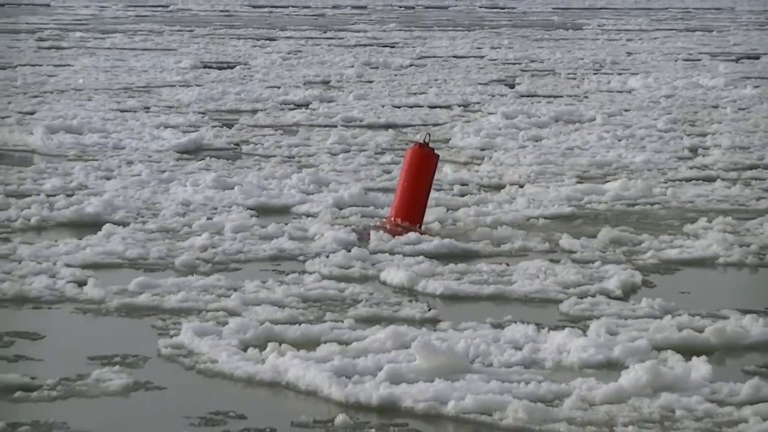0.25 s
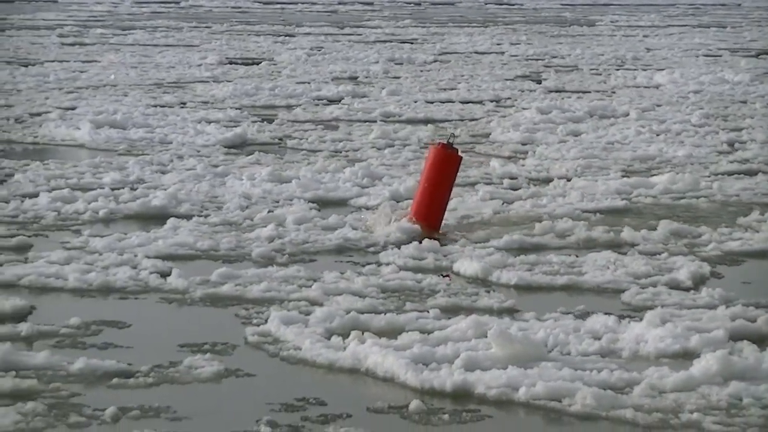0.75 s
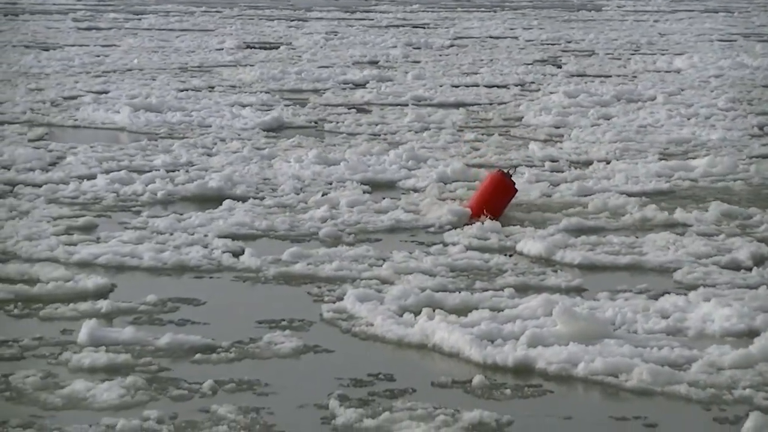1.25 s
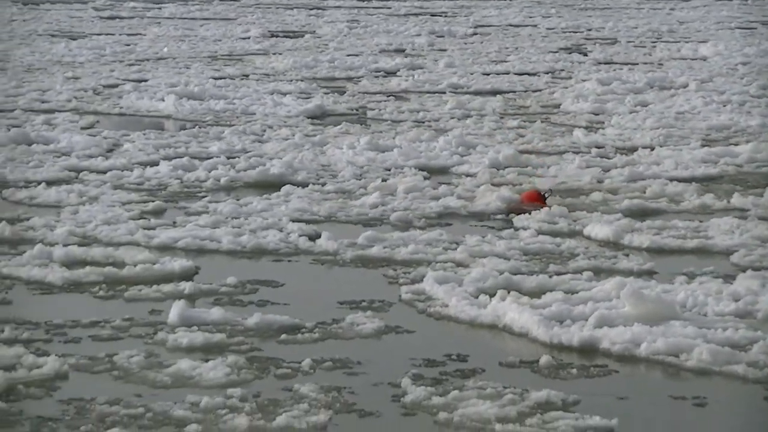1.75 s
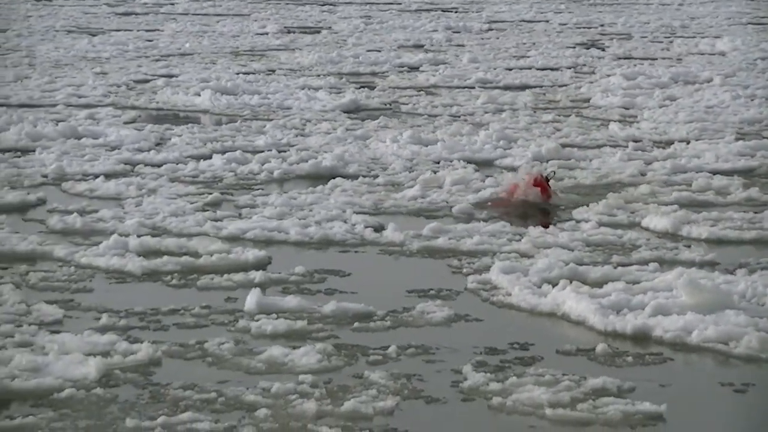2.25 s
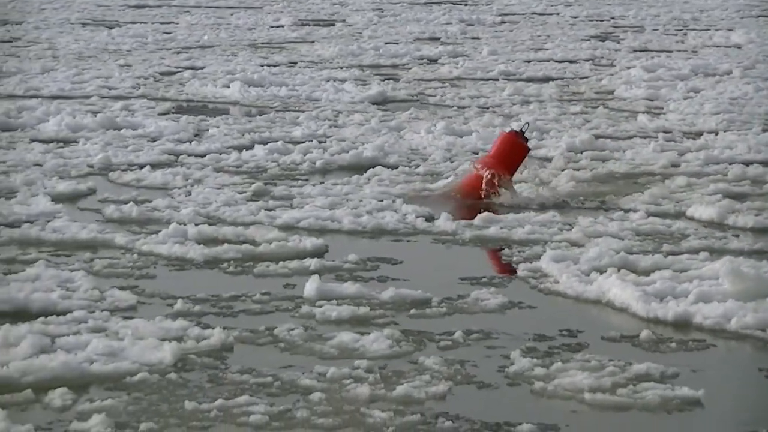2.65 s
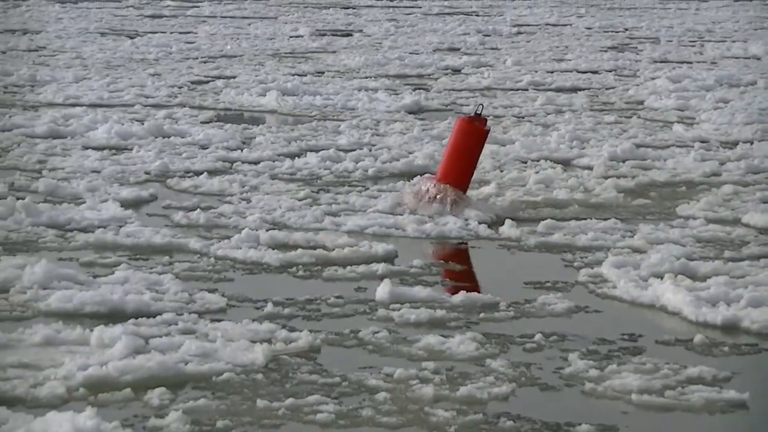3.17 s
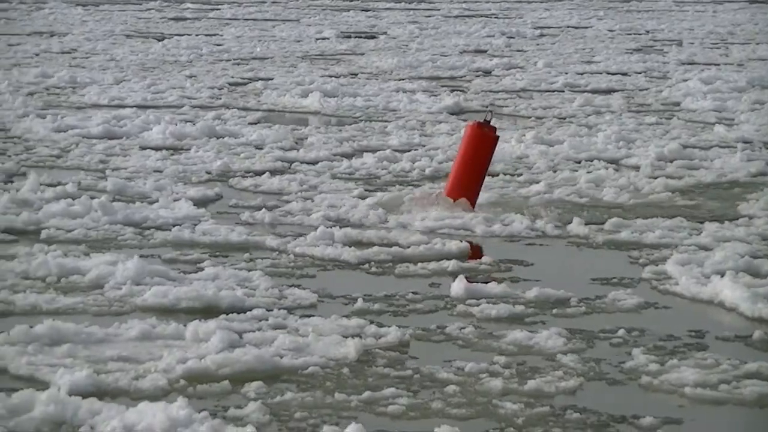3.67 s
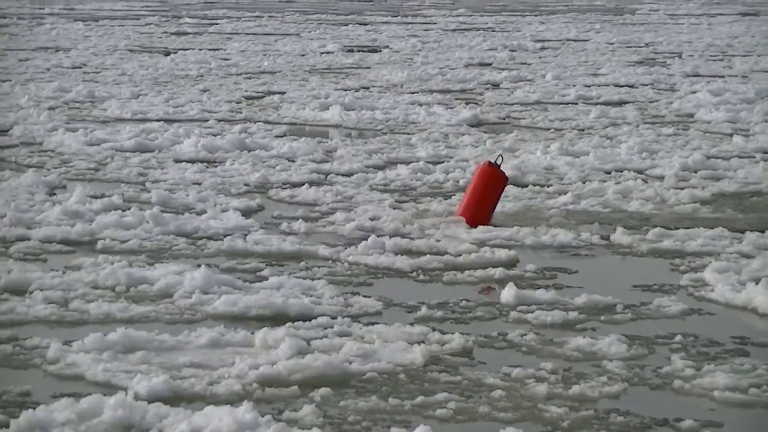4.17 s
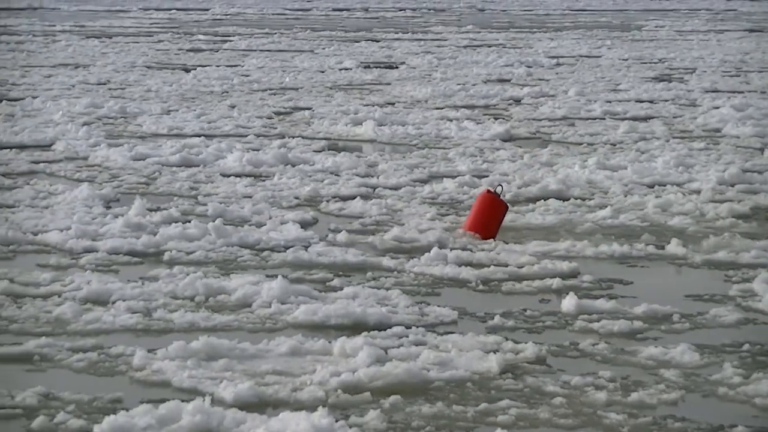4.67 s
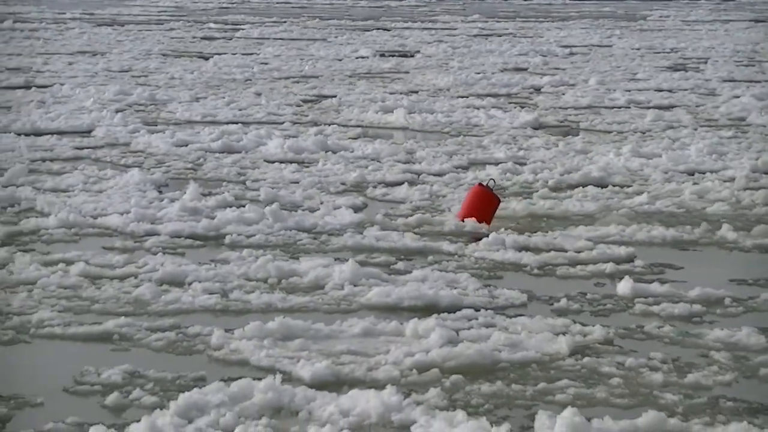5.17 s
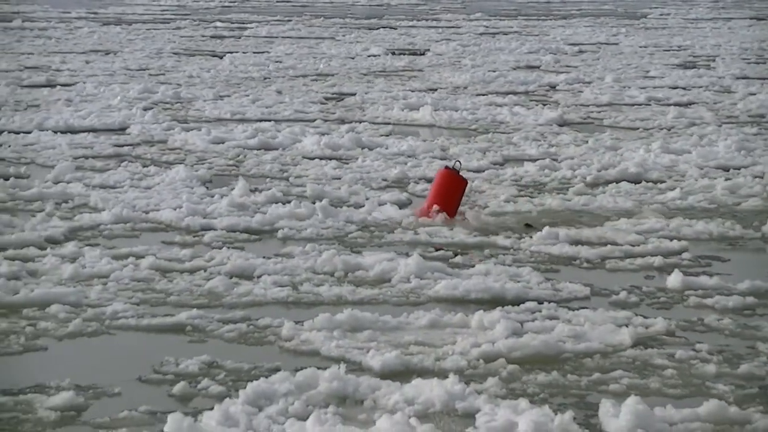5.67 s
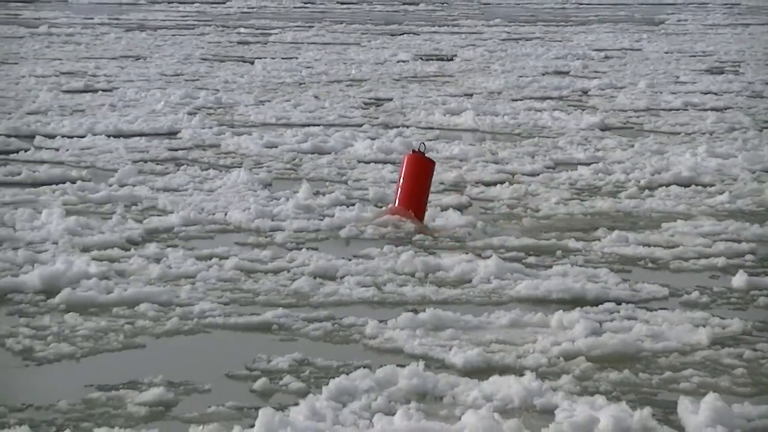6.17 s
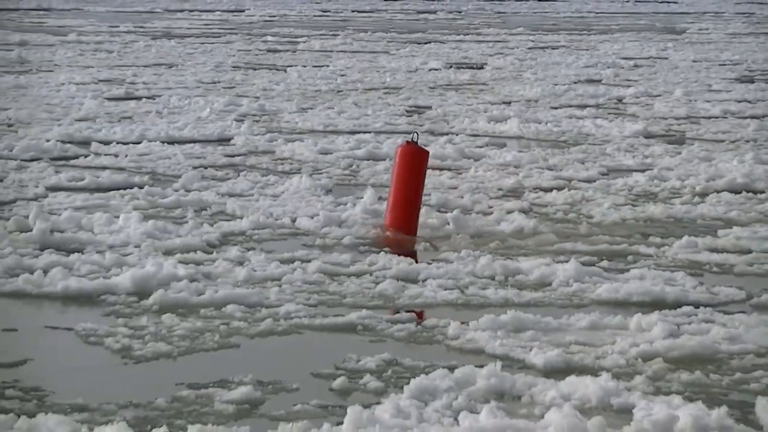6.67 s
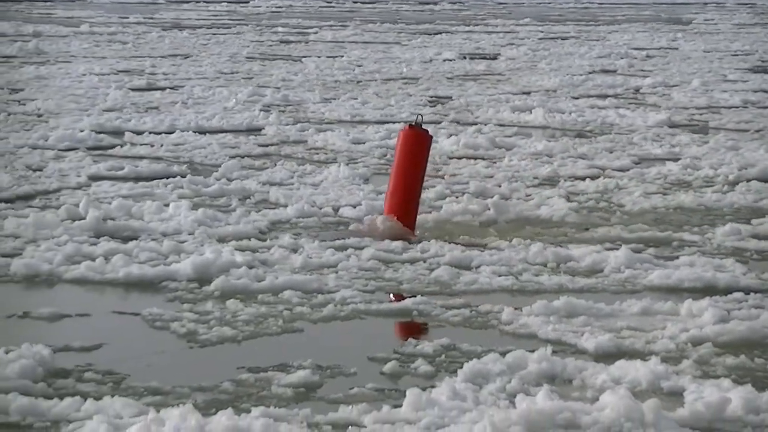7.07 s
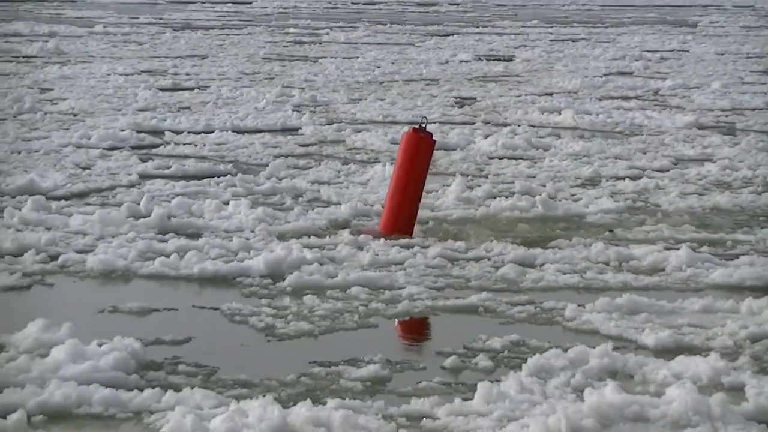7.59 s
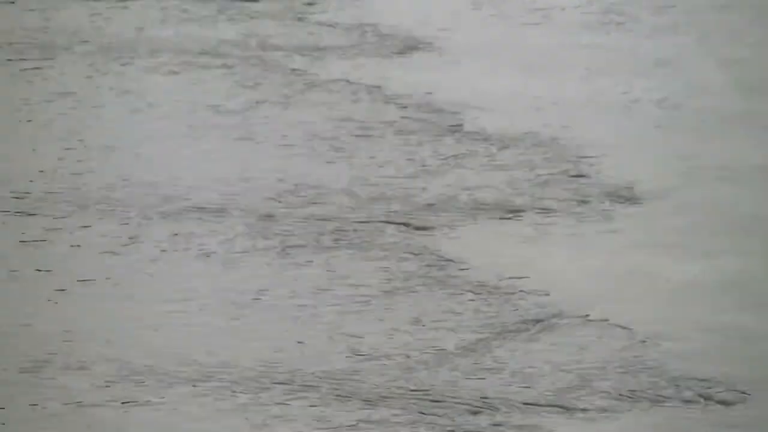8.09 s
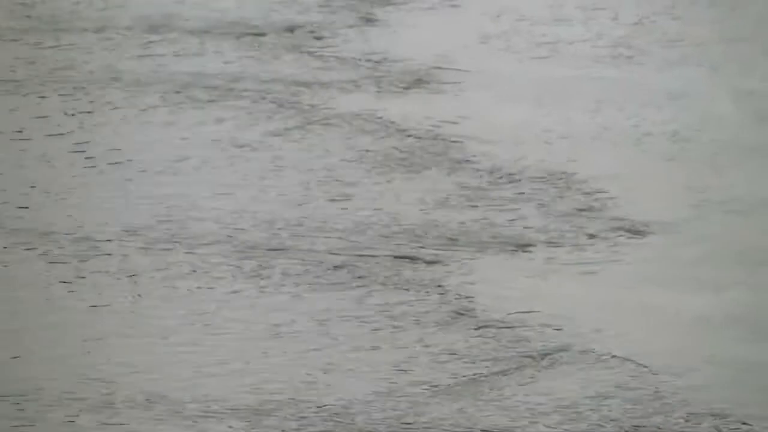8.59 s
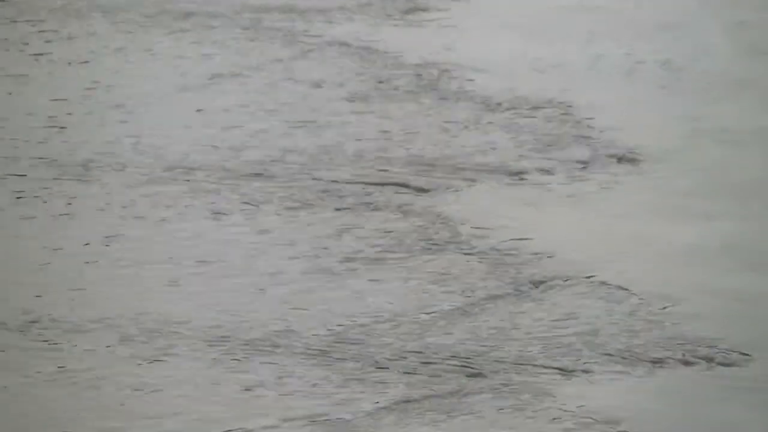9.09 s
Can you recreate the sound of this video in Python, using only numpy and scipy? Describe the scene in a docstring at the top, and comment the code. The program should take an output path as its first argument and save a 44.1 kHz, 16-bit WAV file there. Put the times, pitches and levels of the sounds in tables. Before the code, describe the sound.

Quiet slushy ice floes grind and knock together, a buoy surfaces with a small splash, then suddenly loud, dense rushing water takes over.

```python
"""Drifting river ice, straight ahead: floe rims rub, scrape and knock, driven by one pressure curve.
Slush sizzles as dense tiny impacts; water laps as filtered noise and plops and gulps as brief damped tones.
Crystals snap; a buoy, dragged under by the ice, surfaces with a splash and foam fizzes around it.
Light wind puffs and thuds at the stereo microphone, as shaped noise and short dull tones.
Then the scene changes abruptly to a much louder, steady rush of flowing water, a dense wide churn."""
import sys
import numpy as np
from scipy import signal
from scipy.fft import rfft, irfft, next_fast_len
from scipy.io import wavfile
from scipy.ndimage import uniform_filter1d, map_coordinates

SR = 44100
rng = np.random.default_rng(int(sys.argv[2]) if len(sys.argv) > 2 else 0)


def to_wav(s):
    """Save 16-bit WAV."""
    ch = np.atleast_2d(s).T  # columns
    pcm = np.round(np.clip(ch, -1, 1) * 32767)  # PCM
    wavfile.write(sys.argv[1], SR, pcm.astype(np.int16))


N = 411894

# how hard the floes press together, as the loudness of their rubbing before small offsets: t/s, level/dB
FLOE_PRESSURE = [(0.0, -47.5), (0.26, -49.5), (0.35, -42), (0.64, -43), (0.78, -37.5), (0.98, -35),
                 (1.35, -39), (1.56, -40), (1.78, -45), (2.24, -39.5), (3.16, -33.5), (3.6, -33.5),
                 (3.99, -39), (4.3, -37), (5.11, -47), (5.28, -42), (5.98, -41.5), (6.38, -39),
                 (6.59, -41.5), (6.79, -40), (7.14, -41), (7.87, -40)]
USUAL_DB = -40
# change in scraping as rims lean together or slide past each other: t/s, change/dB
SLIDING_CHANGE = [(1.5, 0.5), (2.1, -2.5), (2.66, -2.5), (2.85, -0.5), (4.4, 1.5), (4.75, 6), (5.2, 0.5),
                  (7.0, 2.5), (7.88, -.5)]
# smaller, higher-pitched floes take over from large ones: t/s, power share of small floes/0-1
SMALL_FLOE_SHARE = [(2.3, 0.1), (3.4, 0.78)]
# sizzle of slush between the floes, before a small lift: t/s, level/dB
SLUSH_LEVEL = [(0.0, -46), (0.42, -44.5), (0.81, -41.5), (2.06, -42), (2.7, -39), (3.51, -38),
               (4.17, -39.5), (4.41, -41), (4.76, -41), (5.55, -43), (6.23, -42), (6.8, -38.5),
               (7.62, -42.5), (7.88, -44.5)]
# spectrum of rubbing, before the pitch of large or small floes: f/Hz, level/dB
RUB_SPECTRUM = [(100, -72), (250, -32.5), (400, -12), (540, -2.5), (720, 1), (860, -0.5), (1000, -11),
                (1500, -33), (3000, -54)]
# spectrum of scraping rims: f/Hz, level/dB
SCRAPE_SPECTRUM = [(600, -45.5), (1000, -5), (1250, 1), (1470, 2), (1850, -2.5), (2150, -2.5), (2600, -14),
                   (5000, -45)]
# spectrum of sizzling slush: f/Hz, level/dB
SIZZLE_SPECTRUM = [(60, -69), (200, -36), (900, -5), (2400, -1.5), (2900, 2), (3400, -2), (4100, -1),
                   (4700, -3.5), (5600, -2), (6600, -6), (8000, -12.5), (12000, -24), (14500, -31.5),
                   (16000, -41)]
# level at the usual pressure/dB, and dB gained per dB of pressure
SCRAPE_DB, SCRAPE_GROWS = -43.5, 0.55
LAP_DB, LAP_GROWS = -64.5, 0.79
PLOP_DB, PLOP_GROWS = -37, 1
GULP_DB, GULP_GROWS = -38, 0.96

# loudest knocks between floes, before the bass cut:
# t/s, rms level/dB, length/s, change of the upper modes/dB, pitch over that of the usual floe/ratio
FLOE_KNOCKS = [(0.747, -33, 0.0067, 3, 0.93), (0.848, -40, 0.027, -18, 0.89), (0.94, -35, 0.013, -10, .95),
               (0.969, -36, 0.022, -16, 1.06), (1.132, -34, 0.013, -6, 0.86),
               (1.247, -32, 0.011, -18, 0.96), (1.411, -32, 0.0096, -8, 1.02),
               (2.563, -34, 0.011, -12, .89), (2.978, -33, 0.018, -1, 1.02), (4.245, -35, .008, -18, 1),
               (4.853, -38, 0.02, -2, 1.2), (5.25, -36, 0.019, 0, 1.02), (5.352, -34, .008, -3, 1.14),
               (5.375, -30, 0.008, -6, 1.06), (5.382, -25, 0.005, 5, 1.01), (5.424, -30.5, 0.023, 3, 1),
               (5.48, -33, 0.007, 0, 1.03), (5.659, -37.5, 0.015, -14, 0.94)]
# ringing modes of the usual floe: f/Hz, level/dB, t60/s
FLOE_MODES = [(730, 2, 0.03), (875, -8, 0.037), (1486, 3, 0.017), (2040, -17, .012), (2830, -11, 0.0051)]
# crumbs around each knock: level below it/dB, half length/s
CRUMBS_DB, CRUMBS_HALF_S = -16, 0.023
# spectrum of crunching crumbs: f/Hz, level/dB
CRUNCH_SPECTRUM = [(50, -45), (150, -29), (300, -8.0), (750, 2.0), (1100, -4.0), (1500, -0.5),
                   (2200, -14.0), (5000, -24), (12000, -54)]

# spectrum of water lapping under the floes, also of the buoy's slosh: f/Hz, level/dB
LAP_SPECTRUM = [(25, -40), (80, -24), (130, -29), (200, -7), (280, 6.5), (380, 1.5), (600, -9), (1500, -51)]
# clearest plops under the floes, before the bass cut: t/s, peak level/dB, f/Hz
CLEAR_PLOPS = [(0.333, -33, 600), (0.474, -31, 655), (0.749, -29, 794), (0.951, -26.5, 770),
               (1.219, -25, 760), (1.274, -23.5, 710), (1.542, -31, 760), (2.106, -29, 685),
               (2.4205, -25, 760), (2.568, -28, 640), (2.7325, -22, 750), (2.846, -25, 760),
               (3.145, -23.5, 760), (3.913, -25, 860), (4.321, -26, 805), (4.3845, -27.5, 750),
               (4.736, -27, 745), (5.378, -16.5, 760), (5.394, -22.5, 680), (5.444, -22, 696),
               (5.6686, -29, 690), (6.256, -23, 790), (6.366, -25, 780), (6.42, -29, 880),
               (6.827, -24.5, 820), (6.847, -26, 740), (7.761, -20.5, 865)]
# gulps and low hollow tones at set times: t/s, peak level/dB, f/Hz
PLACED_GULPS = [(0.775, -30, 740), (2.555, -33, 584), (2.658, -29, 527), (3.411, -41, 253),
                (5.384, -38.5, 330)]
# snapping crystals, before a common trim:
# t/s, level/dB, f/Hz, change of the overtones/dB, power share of ring against dry crack/0-1
CRYSTAL_SNAPS = [(0.7467, -23.5, 2035, -6, .85), (1.411, -25.5, 1575, 1, .7), (1.6926, -29, 2600, -3, .3),
                 (1.956, -32, 3000, -10, .6), (2.666, -28, 3020, -5, .6), (5.6865, -24, 2800, -8, 0.15)]
# overtones of a crystal, before each snap's change: pitch over the lowest mode/ratio, level/dB
CRYSTAL_OVERTONES = [(1.47, 1), (1.9, -7)]

# water washing through the slush: t/s of the middle, rms level/dB at the peak, half length/s, centre f/Hz
SLUSH_WASHES = [(1.68, -46, .05, 4020), (2.166, -42, 0.025, 1700), (2.512, -38, .014, 1900),
                (2.722, -37, 0.008, 1450), (3.235, -44, .024, 6000), (4.062, -38.5, .016, 4100),
                (4.59, -40, 0.036, 1720), (4.858, -45.5, .03, 4180), (5.387, -46, 0.06, 3800),
                (5.42, -39, 0.032, 1100), (5.84, -39, .018, 1500), (5.915, -51.5, 0.048, 6960),
                (6.89, -36, 0.0071, 1500), (7.61, -45, 0.09, 1200)]
WASH_OCTAVES = 0.96  # width of each band

# the buoy surfaces: time and rise/s
SPLASH_S, SPLASH_RISE_S = 2.718, 0.012
# starting level/dB and fall/dB per s
SPRAY_DB, SPRAY_FALL_DB_PER_S = -38, 50
WET_DB, WET_FALL_DB_PER_S = -36, 18
SLOSH_DB, SLOSH_FALL_DB_PER_S = -47.5, 73
# uneven dollops of falling water: rate/per s, swing/dB
DOLLOPS_PER_S, DOLLOP_DB = 45, 2
# sheet of fine droplets: delay/s, length/s, level/dB
SHEET_DELAY_S, SHEET_S, SHEET_DB = 0.014, 0.078, -36.5
# foam around the buoy: middle/s, half length/s, level/dB
FOAM_S, FOAM_HALF_S, FOAM_DB = 2.9, 1.04, -51.5
# spectra of the buoy's spray, wet band, droplets and foam: f/Hz, level/dB
SPRAY_SPECTRUM = [(1500, -39), (2900, 15), (5500, 6.0), (8000, -14), (14500, -31)]
WET_SPECTRUM = [(200, -68), (900, -31), (1300, -4.0), (1500, -1), (1700, -7.5), (2300, -37), (5000, -62)]
DROPLET_SPECTRUM = [(1800, -27), (3200, 2.5), (6000, 0), (8000, -9), (11000, -15), (15000, -20)]
FOAM_SPECTRUM = [(2000, -32), (4500, 2), (7500, 0.5), (10000, -8.0), (14500, -19)]

CUT_S = 7.9125  # the rush replaces the ice
RUSH_DB = -13.5
# spectrum of rushing water: f/Hz, level/dB
RUSH_SPECTRUM = [(24, -86), (40, -64), (101, -55), (202, -35), (260, -20.5), (461, -4.5), (778, -0.5),
                 (1350, -4), (4130, -21.5), (6640, -33), (8730, -47), (10700, -59.5), (13300, -61),
                 (15500, -69)]
# lead of the left over the right channel, roughly: f/Hz, level/dB
RUSH_BALANCE = [(420, 0), (1000, 0.8), (2400, 1.8), (7000, 2.2), (12000, 3)]
# stereo spread of the rush: f/Hz, level/dB
RUSH_SPREAD_SPECTRUM = [(180, -49), (380, -41), (480, -8.0), (750, -1), (1400, -1.5), (3000, -14),
                        (6000, -22.0), (10000, -28.0), (14000, -49)]

# clearest puffs of wind at the microphone, before a common trim: t/s of the middle, rms level/dB, half length/s
WIND_PUFFS = [(0.11, -55, 0.029), (0.4, -50, .012), (0.48, -46, .014), (0.88, -52.5, 0.063),
              (1.138, -44.5, .022), (1.7, -45.5, .011), (4.552, -47.5, 0.011), (5.2, -59, 0.12),
              (7.198, -47, 0.016)]
# breeze, before the same trim: first and last level/dB, time to settle/s, flutter/dB
BREEZE_DB, CALM_DB, SETTLE_S, FLUTTER_DB = -56.5, -65.5, 0.73, 4.5
# gust, before the same trim: first eddy t/s and level/dB, spacing/s, loss per eddy/dB, first half length/s
GUST_S, GUST_DB, EDDY_GAP_S, EDDY_LOSS_DB, EDDY_HALF_S = 7.46, -30, 0.0426, 4.5, 0.0068
# spectrum of wind at the microphone: f/Hz, level/dB
BUFFET_SPECTRUM = [(25, -37), (80, -30), (130, -8.5), (200, 1.5), (450, 4.5), (700, -4.0), (1200, -9.5),
                   (5000, -52), (12000, -73)]
THUD_S = 7.4548
# modes of the gust's thud: f/Hz, peak level/dB
THUD_MODES = [(477, -23.5), (250, -37.5)]
# the level of the ice sounds dips briefly just after the thud: middle/s, half length/s, depth/dB
DIP_S, DIP_HALF_S, DIP_DB = 7.466, 0.01, -5.5
# soft low thuds, one at the abrupt change, before a common lift: t/s, level/dB
LOW_THUDS = [(5.384, -48), (7.912, -24), (8.206, -39)]
# faint stereo width before the rush: f/Hz, level/dB
WIDTH_SPECTRUM = [(50, -15), (250, -24.0), (1000, 2), (4200, -9.0), (6000, -10), (10500, -13.0), (13000, -48)]
TOP_HZ = 15600  # band limit


def drifting_ice():
    """Rims catch and slip in small jerks, while crystals in the slush break by the thousand."""
    jerk = wobble(22)  # one stick-slip motion drives both the rub and the scrape

    small_share = curve(SMALL_FLOE_SHARE)
    large, small = [
        coloured(contacts(rate=450, spread_db=1.0, far_db=2.0), [(hz * pitch, db) for hz, db in RUB_SPECTRUM])
        for pitch in (0.98, 1.12)]
    floes = np.sqrt(1 - small_share) * large + np.sqrt(small_share) * small
    rub_db = USUAL_DB + pressure() - 0.7 + 0.81 * jerk
    rub = amp(rub_db) * patchy(floes, depth_db=0.76)

    rims = patchy(contacts(rate=700, spread_db=1.0, far_db=3.5), depth_db=1.5)
    scrape_db = SCRAPE_DB + SCRAPE_GROWS * pressure() + curve(SLIDING_CHANGE) + 0.35 * jerk
    scrape = amp(scrape_db) * coloured(rims, SCRAPE_SPECTRUM)

    crystals = patchy(contacts(rate=3000, spread_db=6.5, far_db=7.0), depth_db=1.04)
    sizzle_db = curve(SLUSH_LEVEL) + 0.93 + 0.38 * wobble(10)
    sizzle = amp(sizzle_db) * coloured(crystals, SIZZLE_SPECTRUM)
    return rub + scrape + sizzle


def pressure():
    """dB by which the floes press harder than usual, per sample."""
    return curve(FLOE_PRESSURE) - USUAL_DB


def knocks():
    """Each contact is a short run of slips into the briefly ringing modes of wet ice."""
    out = np.zeros(N)
    for s, db, length, upper_db, pitch in FLOE_KNOCKS:
        count = int(length * SR)
        knock = 0
        for hz, level, t60 in FLOE_MODES:
            slips = rng.standard_normal(count) * signal.windows.tukey(count)
            mode = signal.fftconvolve(slips, ring(hz * pitch, t60, attack=0.00045))
            mode_db = level + (hz > 1100) * upper_db
            knock = knock + amp(mode_db) * unit(mode)
        # all the energy, tail included, counts towards the rms over the knock's length
        add(out, s, amp(db) * knock * np.sqrt(count / np.sum(knock ** 2)))
    return no_bass(out)


def crumbs():
    """Every knock crushes the soft rim: a short crunch leads into it and trails after it."""
    power = sum(amp(2 * db) * swell(s + length, CRUMBS_HALF_S) for s, db, length, _, _ in FLOE_KNOCKS)
    crunch = coloured(contacts(rate=400, spread_db=3.5, far_db=-4), CRUNCH_SPECTRUM)
    return amp(CRUMBS_DB) * np.sqrt(power) * crunch


def no_bass(x):
    """A small slab radiates hardly any bass."""
    return signal.sosfilt(signal.butter(4, 380, "high", fs=SR, output="sos"), x)


def plops():
    """Water claps shut under the edge of a floe: a few round cycles swell and die at once."""
    out = np.zeros(N)
    jostle_db = PLOP_DB + PLOP_GROWS * pressure()
    scattered = random_tones(24, jostle_db, spread_db=1, typical_hz=733, octaves=0.27)
    for s, db, hz in list(CLEAR_PLOPS) + scattered:
        add(out, s, amp(db) * ring(hz, t60=0.011, attack=0.003))
    return no_bass(out)


def lapping():
    """Small waves slap the undersides of the floes, harder as the floes jostle."""
    level_db = LAP_DB + LAP_GROWS * pressure() + 6.3 * wobble(21)
    return amp(level_db) * coloured(contacts(rate=90, spread_db=3.0, far_db=2.0), LAP_SPECTRUM)


def gulps():
    """Air pockets under the ice pulse, rising slightly in pitch; pressure makes the scattered ones louder."""
    out = np.zeros(N)
    squeeze_db = GULP_DB + GULP_GROWS * pressure()
    scattered = random_tones(8.2, squeeze_db, spread_db=1, typical_hz=734, octaves=0.168)
    for s, db, hz in list(PLACED_GULPS) + scattered:
        add(out, s, amp(db) * ring(hz, t60=0.042, attack=0.007, glide=0.069))
    return out


def snaps():
    """A crystal breaks with a tiny broad crack and a bright, brief ring."""
    out = np.zeros(N)
    t = np.arange(SR // 8) / SR
    for s, db, hz, upper_db, ringing in CRYSTAL_SNAPS:
        crack = band(rng.standard_normal(len(t)), hz * 0.74, hz * 1.4) * amp(-60 * t / 0.02)
        modes = [(1, 0)] + [(ratio, level + upper_db) for ratio, level in CRYSTAL_OVERTONES]
        tone = sum(amp(level) * ring(hz * ratio, t60=0.016, attack=0.002) for ratio, level in modes)
        snap = np.sqrt(ringing) * tone + 2.4 * np.sqrt(1 - ringing) * crack
        add(out, s, amp(db - 3.0) * snap)
    return out


def splash():
    """The buoy bursts up: droplets and bright spray over a low slosh and a slowly draining, hollow wet band."""
    age = np.maximum(np.arange(N) / SR - SPLASH_S, 0)
    rise = np.minimum(age / SPLASH_RISE_S, 1)
    dollops_db = DOLLOP_DB * wobble(DOLLOPS_PER_S)

    spray = coloured(contacts(rate=5200, spread_db=10, far_db=4), SPRAY_SPECTRUM)
    spray *= amp(SPRAY_DB - SPRAY_FALL_DB_PER_S * age + 0.5 * dollops_db)
    wet = coloured(contacts(rate=610, spread_db=3.0, far_db=2), WET_SPECTRUM)
    wet *= amp(WET_DB - WET_FALL_DB_PER_S * age + dollops_db)
    slosh = coloured(rng.standard_normal(N), LAP_SPECTRUM)
    slosh *= amp(SLOSH_DB - SLOSH_FALL_DB_PER_S * age)

    flight = np.clip((age - SHEET_DELAY_S) / SHEET_S, 0, 1)
    droplets = coloured(contacts(rate=5000, spread_db=7, far_db=-1), DROPLET_SPECTRUM)
    sheet = amp(SHEET_DB) * np.sqrt(4 * flight * (1 - flight)) * droplets
    return sheet + rise * (spray + wet + slosh)


def foam():
    """Tiny bubbles burst where the buoy churns the slush."""
    fizz = coloured(contacts(rate=3000, spread_db=5, far_db=4), FOAM_SPECTRUM)
    return amp(FOAM_DB) * swell(FOAM_S, FOAM_HALF_S) * fizz


def washes():
    """Water squeezed through the slush bursts a cloud of bubbles; the finer they are, the higher the hiss."""
    out = np.zeros(N)
    bubbles = contacts(rate=1600, spread_db=3.5, far_db=-4)
    half_band = 2 ** (WASH_OCTAVES / 2)
    for s, db, half_length, hz in SLUSH_WASHES:
        hiss = unit(band(bubbles, hz / half_band, hz * half_band))
        out += amp(db) * swell(s, half_length) * hiss
    return out


def rushing_water():
    """Turbulent water: a dense churn of bubbles and splashes, its treble leaning to the left."""
    surge = amp(0.1 * wobble(10))
    churn = surge * patchy(contacts(rate=5000, spread_db=2.5, far_db=3.0), depth_db=0.42)
    mid = amp(RUSH_DB) * coloured(churn, RUSH_SPECTRUM)
    balance_db = np.interp(np.fft.rfftfreq(N, 1 / SR), *np.transpose(RUSH_BALANCE))
    lean = irfft(rfft(mid) * (amp(balance_db / 2) - 1), N)
    spread = amp(-37.0) * coloured(rng.standard_normal(N), RUSH_SPREAD_SPECTRUM)
    side = lean + spread
    return np.array([mid + side, mid - side])


def wind():
    """Eddies strike the microphone; each port also flutters a little in its own way."""
    breeze_db = CALM_DB + (BREEZE_DB - CALM_DB) * swell(0, SETTLE_S)
    force = amp(breeze_db + FLUTTER_DB * wobble(10))
    # the gust sheds a train of ever weaker, longer eddies
    eddies = [(GUST_S + k * EDDY_GAP_S, GUST_DB - k * EDDY_LOSS_DB, EDDY_HALF_S * np.sqrt(k + 1))
              for k in range(4)]
    for s, db, half_length in list(WIND_PUFFS) + eddies:
        force += amp(db) * swell(s, half_length)
    shared = rng.standard_normal(N)
    ports = [coloured(shared + rng.standard_normal(N), BUFFET_SPECTRUM) for _ in range(2)]
    return force * amp(-1.0) * np.array(ports)


def thud():
    """The front of the strong gust hits the microphone with one firm, dull thud."""
    out = np.zeros(N)
    for hz, db in THUD_MODES:
        add(out, THUD_S, amp(db) * ring(hz, t60=0.019, attack=0.0075))
    return out


def low_thuds():
    """A deep thud each, dying almost at once."""
    out = np.zeros(N)
    for s, db in LOW_THUDS:
        add(out, s, amp(db + 1.5) * ring(hz=75, t60=0.011, attack=0.0009))
    return out


def amp(db):
    """Decibels to gain."""
    return 10 ** (np.asarray(db) / 20)


def unit(x):
    """Scale to rms 1."""
    return x / np.sqrt(np.mean(x ** 2) + 1e-20)


def curve(rows):
    """One value per sample, in straight lines between the (t/s, value) rows."""
    return np.interp(np.arange(N) / SR, *np.transpose(rows))


def swell(s, half_length):
    """A smooth rise and fall of peak 1 around time s."""
    return np.exp(-0.5 * ((np.arange(N) / SR - s) / half_length) ** 2)


def wobble(rate):
    """A smooth random curve, rate knots a second."""
    knots = rng.standard_normal(int(N * rate / SR) + 4)
    return map_coordinates(knots, [np.arange(N) * rate / SR])


def band(x, low_hz, high_hz):
    """Keep the band between two frequencies."""
    return signal.lfilter(*signal.butter(2, [low_hz, high_hz], "band", fs=SR), x)


def coloured(x, points):
    """x through a causal filter with the (f/Hz, level/dB) shape, at rms 1."""
    m = 2 * next_fast_len(N // 2 + SR // 4)
    hz, db = np.transpose(points)
    shape_db = np.interp(np.log(np.fft.rfftfreq(m, 1 / SR) + 1), np.log(hz), db)
    # folding the cepstrum onto positive times makes the filter causal
    cepstrum = irfft(np.log(amp(shape_db)), m)
    response = np.exp(rfft(2 * cepstrum[:m // 2], m))
    return unit(irfft(rfft(x, m) * response, m)[:N])


def patchy(x, depth_db):
    """Swell and fade x in random patches of time and frequency."""
    z = signal.stft(x, nperseg=512)[2]
    field = uniform_filter1d(rng.standard_normal(z.shape), size=5, axis=0)
    field = uniform_filter1d(field, size=10, axis=1)
    return signal.istft(z * amp(depth_db * unit(field)), nperseg=512)[1][:N]


def contacts(rate, spread_db, far_db):
    """Random tiny impacts of uneven size, rate a second, over the blur of countless distant ones."""
    hits = rng.random(N) < rate / SR
    size_db = spread_db * np.clip(rng.standard_normal(N), -2, 2)
    near = hits * amp(size_db) * rng.choice([-1, 1], N)
    far = rng.standard_normal(N)
    return unit(unit(near) + amp(far_db) * far)


def random_tones(rate, level_db, spread_db, typical_hz, octaves):
    """Random (t/s, level/dB, f/Hz) events, rate a second, following the level curve."""
    starts = np.flatnonzero(rng.random(N) < rate / SR)
    chance = rng.standard_normal((len(starts), 2))
    return [(i / SR, level_db[i] + spread_db * a, typical_hz * 2 ** (octaves * b))
            for i, (a, b) in zip(starts, chance)]


def ring(hz, t60, attack, glide=0):
    """A damped vibration under an envelope of peak 1; its pitch rises by the share glide in each t60."""
    t = np.arange(SR // 8) / SR
    life = amp(-60 * t / t60) * (1 - np.exp(-(t / attack) ** 2))
    cycles = hz * t * (1 + 0.5 * glide * t / t60)
    return life / life.max() * np.sin(2 * np.pi * (cycles + rng.random()))


def add(track, s, sound):
    """Mix a sound into the track at time s."""
    part = track[round(s * SR):][:len(sound)]
    part += sound[:len(part)]


def scene():
    """The ice lies straight ahead; the rush replaces it all at once."""
    ice = drifting_ice() + knocks() + crumbs() + plops() + lapping() + gulps() + snaps()
    ice = ice + splash() + foam() + washes()
    ice = ice * amp(DIP_DB * swell(DIP_S, DIP_HALF_S))
    width = amp(-62) * coloured(rng.standard_normal(N), WIDTH_SPECTRUM)
    shore = ice + thud() + np.array([width, -width]) + wind()
    change = uniform_filter1d(1.0 * (np.arange(N) / SR > CUT_S), size=32)
    return (1 - change) * shore + change * rushing_water() + low_thuds()


def record(dry):
    """The camera keeps nothing above its band limit."""
    m = next_fast_len(N + SR // 2)
    kept = np.fft.rfftfreq(m, 1 / SR) < TOP_HZ
    return irfft(rfft(dry, m) * kept, m)[:, :N]


dry = scene()
out = record(dry)
to_wav(out)
```